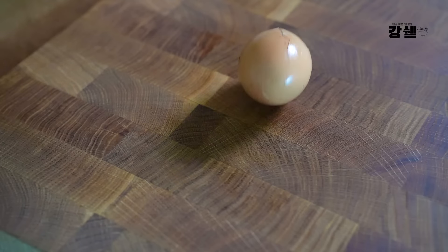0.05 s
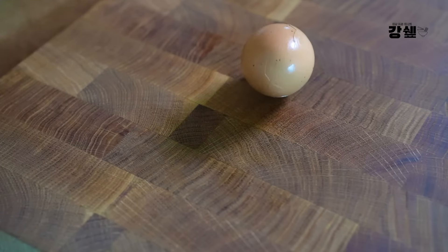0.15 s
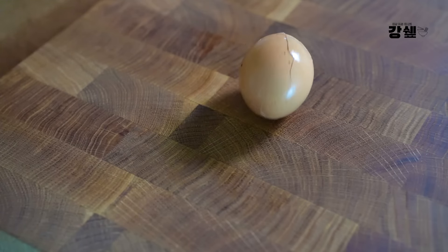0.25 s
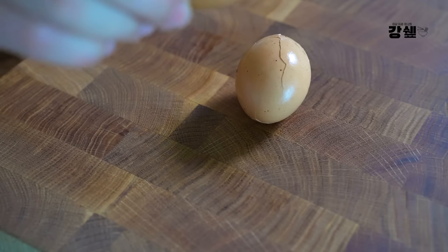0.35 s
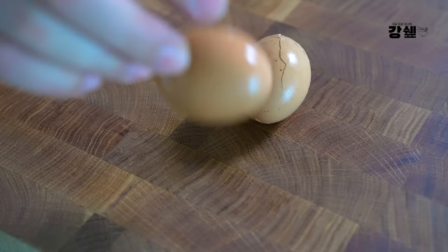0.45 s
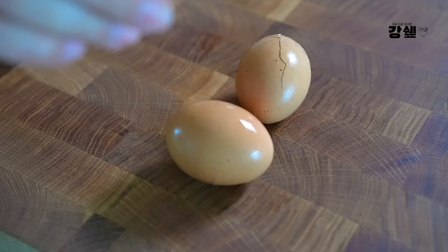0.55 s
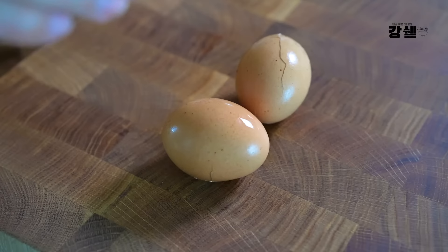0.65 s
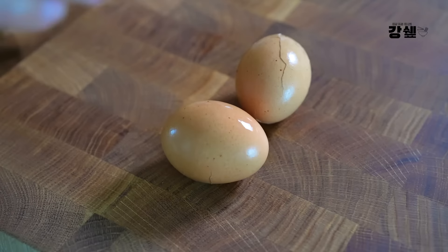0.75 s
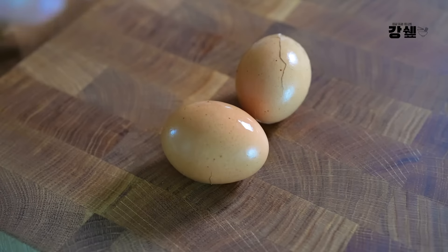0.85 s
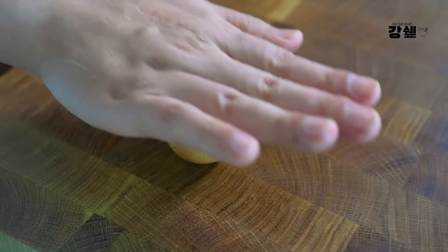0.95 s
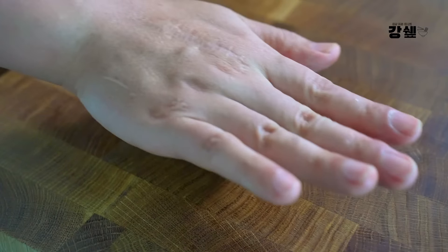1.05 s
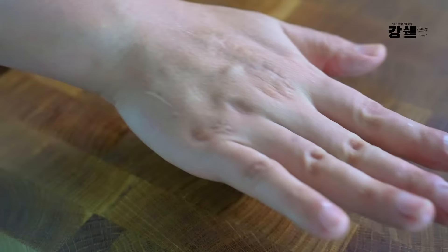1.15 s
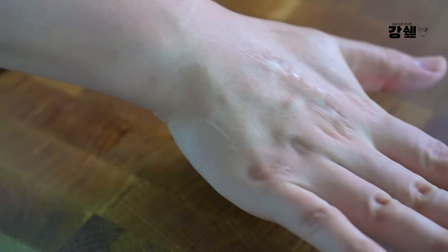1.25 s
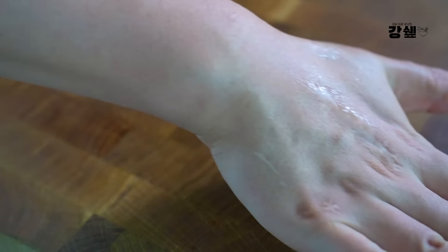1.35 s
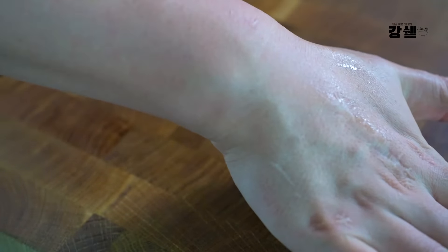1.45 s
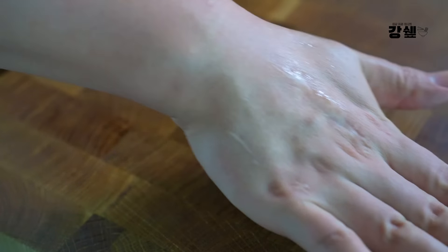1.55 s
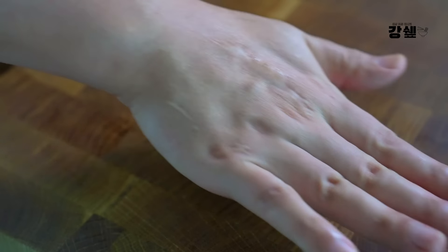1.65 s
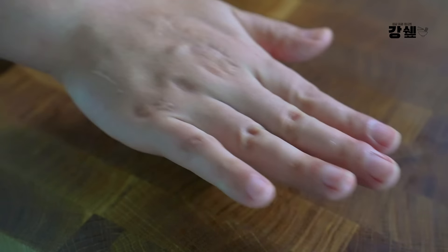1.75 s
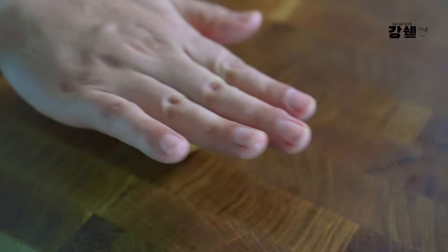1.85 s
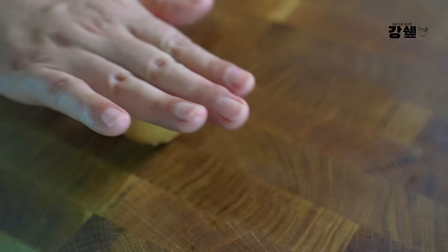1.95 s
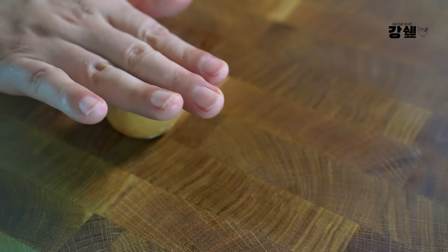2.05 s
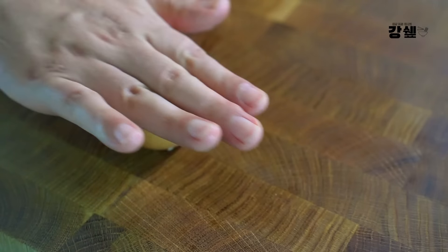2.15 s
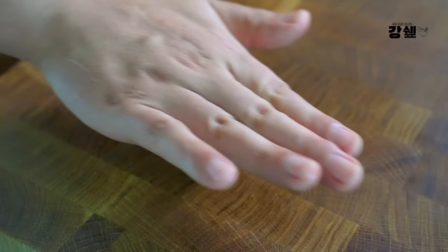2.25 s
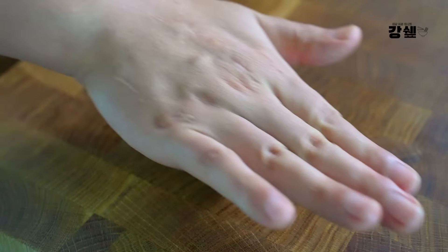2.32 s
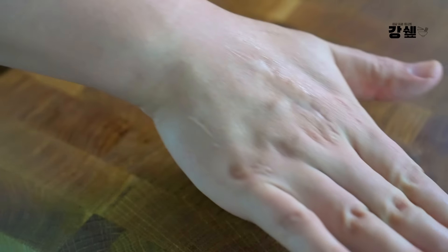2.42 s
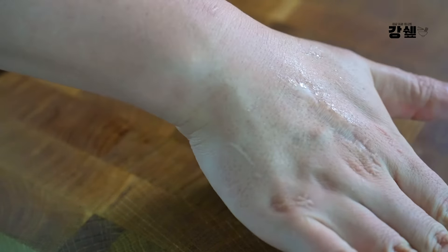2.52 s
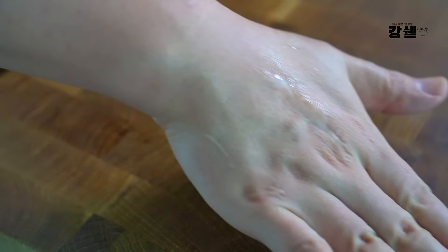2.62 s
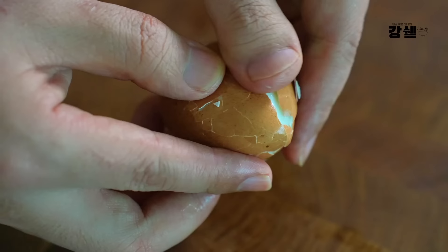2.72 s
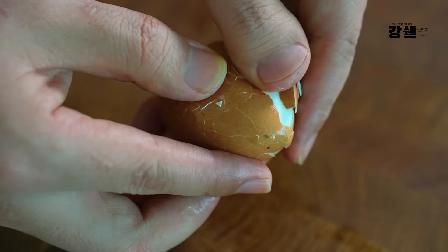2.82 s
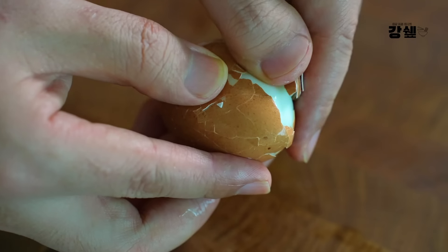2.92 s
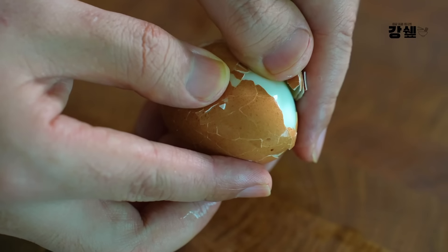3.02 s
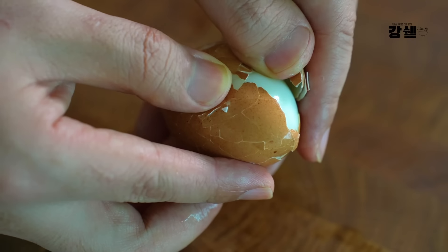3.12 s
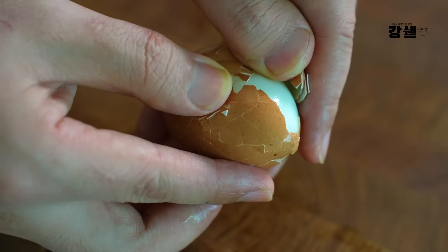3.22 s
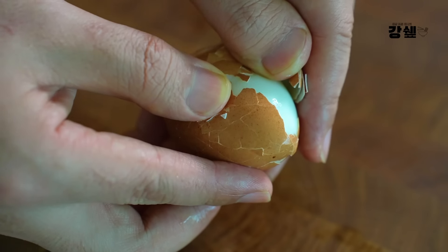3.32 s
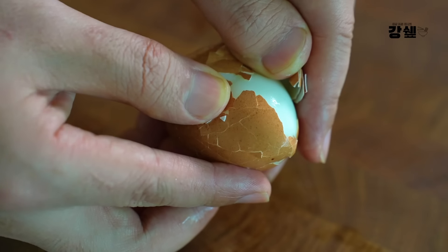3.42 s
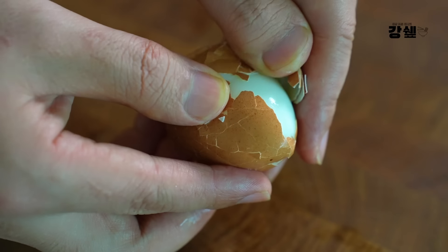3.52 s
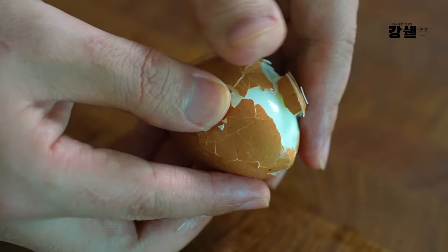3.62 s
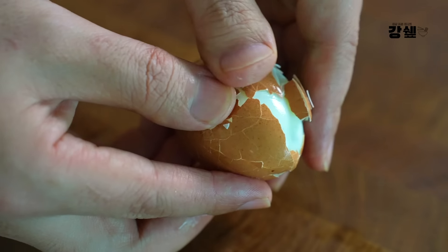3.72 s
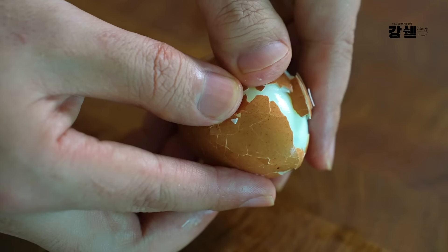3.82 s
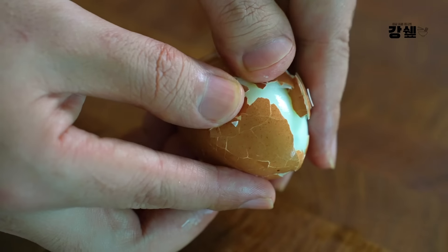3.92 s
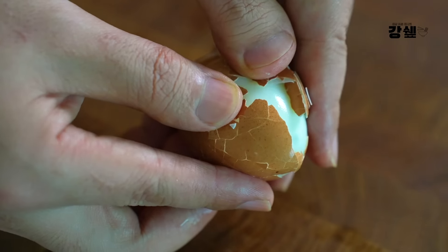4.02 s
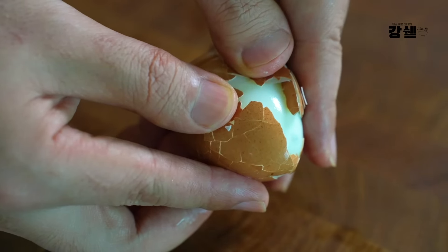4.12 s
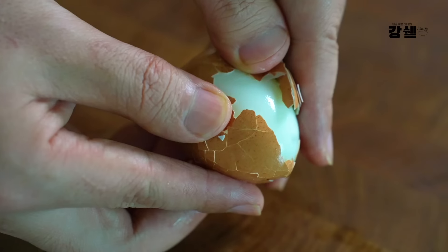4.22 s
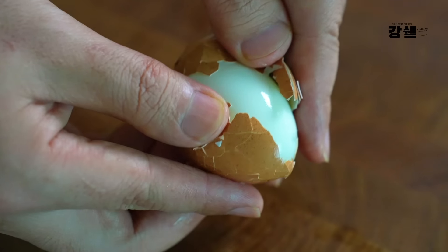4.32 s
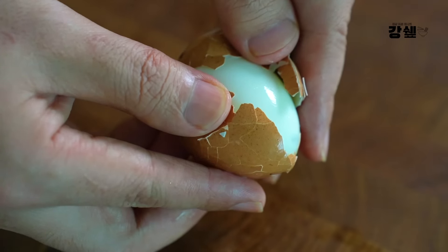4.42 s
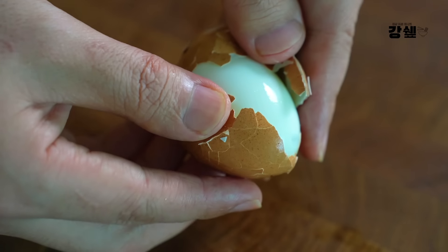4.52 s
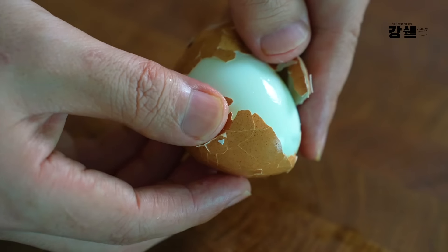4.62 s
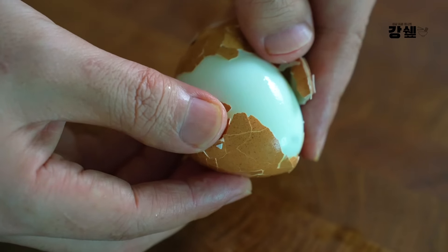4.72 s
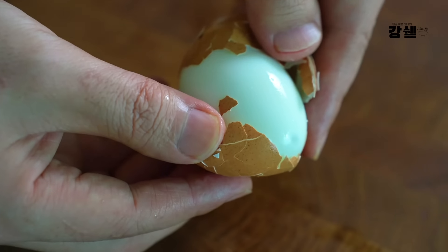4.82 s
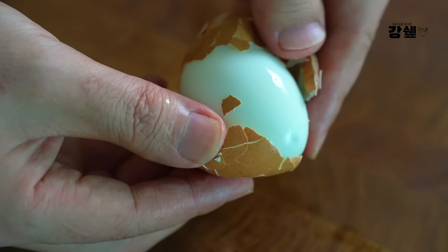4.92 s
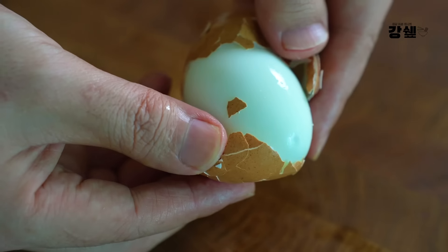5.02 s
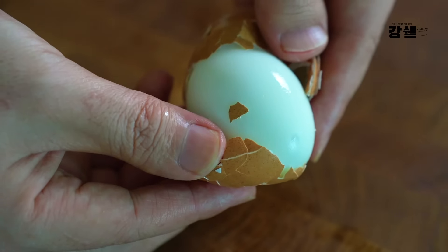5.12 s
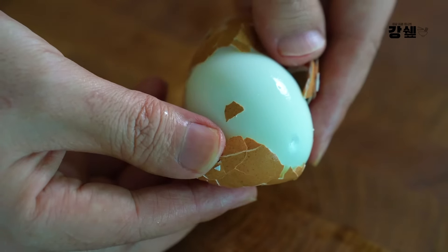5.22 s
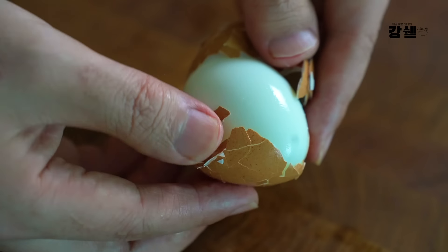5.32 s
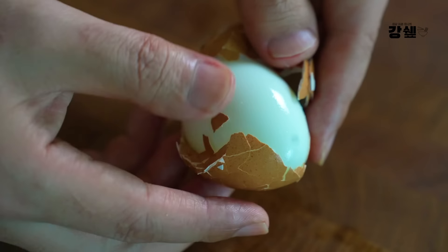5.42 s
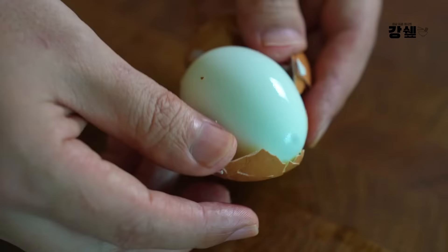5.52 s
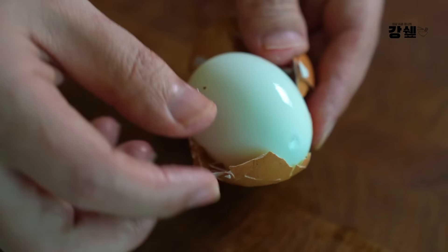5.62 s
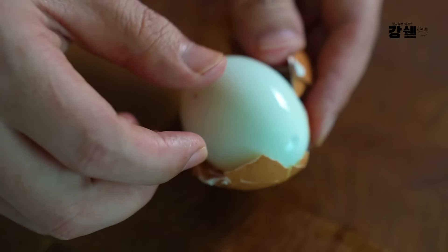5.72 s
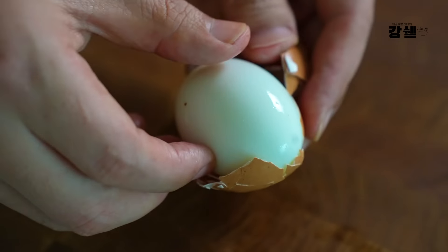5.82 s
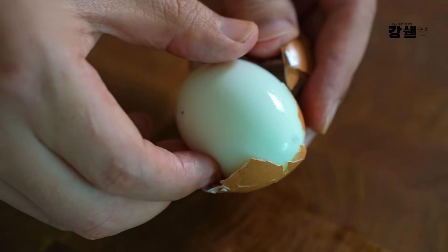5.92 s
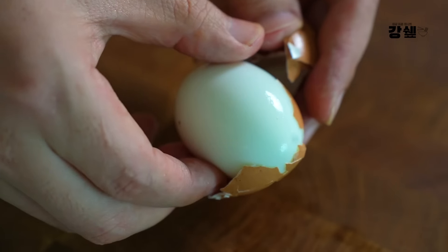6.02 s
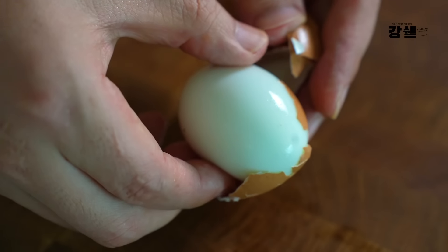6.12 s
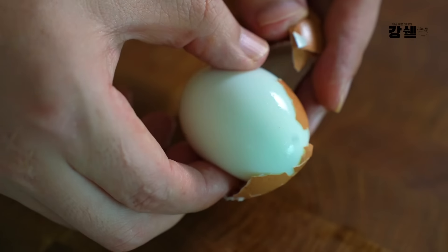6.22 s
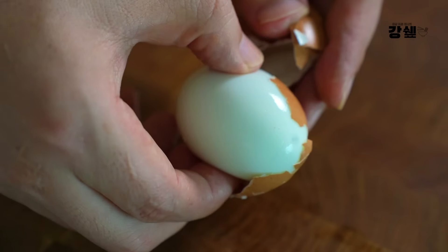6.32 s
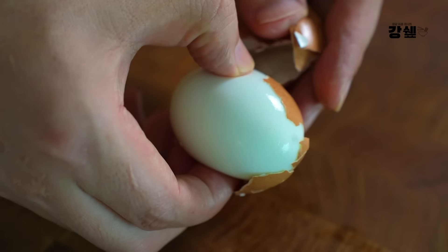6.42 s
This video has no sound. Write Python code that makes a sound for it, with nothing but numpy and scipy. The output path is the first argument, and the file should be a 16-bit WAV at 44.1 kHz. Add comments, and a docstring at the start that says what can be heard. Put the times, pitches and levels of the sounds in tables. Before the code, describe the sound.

Two sharp, loud knocks of boiled eggs on a thick wooden board, each with a faint diffuse tail that stops abruptly. A palm rolls one egg back and forth, crackling and crunching its shell over low wooden bumps. Then, very close, fingers peel it: thin papery tearing, bright tiny snaps, one stronger crack midway, then lighter ticks. Quiet kitchen, close microphone, faint low room noise.

```python
"""Two boiled eggs strike a thick wooden board: impulses excite its modes, and each diffuse tail stops dead.
A palm then rolls one egg to and fro: bursts of micro-fractures crack and crunch its shell against the wood.
Last, close by, thumbs peel it: tearing steps excite the resonances of the flap and of the hollow beneath,
plates snap and briefly ring, and the slipping membrane squeaks a little.
Soft low bumps of the board come throughout, over the steady filtered noise of a quiet kitchen."""
import sys
import numpy as np
from scipy import signal
from scipy.fft import rfft, irfft
from scipy.io import wavfile
from scipy.ndimage import uniform_filter1d

SR = 44100
rng = np.random.default_rng(int(sys.argv[2]) if len(sys.argv) > 2 else 0)


def wav_record(signal):
    """Record a signal, one row per channel, as 16-bit PCM in the file named by sys.argv[1]."""
    frames = np.transpose(np.atleast_2d(signal))
    bounded = np.clip(frames, -1, 1)
    # unit amplitude maps onto the largest positive 16-bit level
    quanta = np.round(bounded * 32767).astype(np.int16)
    wavfile.write(sys.argv[1], SR, quanta)


N = 284886

# Egg meets board: (time [s], level [dB], thump level [dB], spot on the board [0-1],
# relative tail level [dB], time the tail holds its level [s], time until all stops [s])
KNOCKS = [(0.0085, -1.5, -19.5, 0.01, -27.5, 0.064, 0.371), (0.547, -5.5, -21, 0.98, -28, 0.13, 0.396)]
# Shell gives way under the palm: (time [s], relative level [dB], treble gain [dB])
CRACKS = [(1.2561, -30, -9), (1.2761, -22, -5.5), (1.3194, -10, 0), (1.336, -16.5, -3),
          (1.3409, -12.5, 0.5), (1.3497, -9, -1.5), (1.3685, -13.5, -1), (1.376, -13, 0.5),
          (1.4113, -25, 0.5), (1.4172, -17, -9.5), (1.4401, -11.5, 2), (1.5216, -16, -5.5),
          (1.5473, -25, 0), (1.5715, -20, -1), (1.6022, -17, -8), (1.6205, -21, 5), (1.6393, -23, -8),
          (1.6917, -18, -11), (1.718, -15.5, -5), (1.752, -19, -11), (1.7605, -18.5, -14),
          (1.7742, -29, 10), (1.798, -17.5, -12), (1.8181, -22, 17), (1.858, -19.5, -4),
          (1.877, -23.5, -12), (1.9536, -25, -14), (2.0191, -28, -6), (2.2078, -23, -5), (2.237, -23, -2.5),
          (2.2705, -18.5, -6), (2.2766, -22.5, 19), (2.2866, -16.5, -21), (2.3065, -26.5, -17),
          (2.4079, -25, -11), (2.505, -27.5, -9), (2.7382, -22, -8.5)]
# Light contacts with the board, as the first egg settles, the palm lands and a piece of shell comes away:
# (time [s], relative level [dB], treble gain [dB])
TAPS = [(0.072, -26, -15), (0.102, -23, 1), (1.1263, -40.5, -5), (4.313, -21, 3.5), (4.326, -25.5, 22)]
# Soft bumps on the board, from the hands and from the egg rolling over its flattened patches:
# (time [s], relative level [dB], pitch [Hz])
BUMPS = [(0.072, -9, 67), (0.098, -17, 124), (1.015, -23, 41.8), (1.322, -17.5, 120), (1.352, -24, 159),
         (1.435, -20.5, 78), (1.632, -15, 73), (1.71, -18.5, 79), (1.858, -21.5, 72), (1.979, -21, 73),
         (2.245, -27, 77.6), (2.476, -29, 68), (2.687, -33.5, 73), (4.314, -30.5, 121),
         (5.308, -38.5, 68.5)]
# Shell plates snap off: (time [s], relative level [dB], ring frequency [Hz])
SNAPS = [(2.779, -27, 4430), (2.865, -28, 3900), (2.8892, -26.5, 3100), (2.8938, -24, 6050),
         (2.9475, -22.5, 2950), (2.9559, -26.5, 3030), (3.0274, -22, 6230), (3.1061, -33.5, 5730),
         (3.1402, -34, 3020), (3.2094, -31, 6300), (3.2636, -32, 11100), (3.283, -26.5, 2900),
         (3.302, -27, 2980), (3.3119, -30, 2930), (3.3165, -27.5, 3000), (3.3576, -35, 3100),
         (3.3667, -16, 6050), (3.4164, -31.5, 3030), (3.4827, -35.5, 5570), (3.5603, -27.5, 2580),
         (3.5838, -28, 3020), (3.667, -25.5, 4100), (3.7841, -32, 4650), (3.8195, -21.5, 4500),
         (3.842, -31, 2760), (3.8569, -13.5, 4270), (3.895, -27.5, 2720), (3.903, -24, 6700),
         (3.9752, -21, 7400), (3.9966, -21.5, 6960), (4.005, -23, 7000), (4.0675, -21, 4520),
         (4.1302, -26, 2760), (4.134, -24, 5800), (4.19, -22, 5730), (4.213, -16.5, 5750),
         (4.2414, -17, 2600), (4.2448, -11.5, 2130), (4.2651, -12.5, 3030), (4.2914, 0, 5660),
         (4.299, -13.5, 5350), (4.8013, -28, 4070), (4.869, -28, 3780), (4.977, -37, 7200),
         (4.9913, -31, 6600), (5.01, -26, 2080), (5.116, -26, 10950), (5.204, -35, 3400),
         (5.2187, -36, 5500), (5.237, -33, 2410), (5.2591, -26.5, 3400), (5.2844, -31, 2600),
         (5.4858, -41, 5430), (5.4997, -37, 5000), (5.5354, -29.5, 5550), (5.6283, -43.5, 2580),
         (5.7503, -34, 5660), (5.7573, -37, 5550), (5.7694, -34, 5400), (5.82, -35.5, 5470),
         (5.9043, -37.5, 5600), (5.9613, -26, 2700), (5.9933, -29.5, 2740), (6.0635, -18, 2830),
         (6.066, -21.5, 11900), (6.224, -29.5, 3040), (6.2308, -31, 6230), (6.2704, -34, 7900),
         (6.299, -25.5, 7900), (6.325, -25.5, 5900), (6.349, -31.5, 7900), (6.3878, -38, 4300),
         (6.4206, -31, 6140)]
# Every plate mostly rings; low-pitched ones have more click in them than higher ones:
# (ring frequency [Hz], share of the ring in the energy [0-1])
RING_SHARE = [(2700, 0.59), (4300, 0.86), (9000, 0.81)]
# Resonance of the gap under the palm, higher as the hand rolls forward: (time [s], frequency [Hz])
PALM_GAP = [(1.08, 5270), (1.5, 6920), (2.1, 5100), (2.62, 6300)]
# Lifted flap of shell: (time [s], main resonance [Hz], resonance of the hollow beneath [Hz],
# upper resonance [Hz])
FLAP = [(2.76, 4400, 3040, 6350), (3.78, 4600, 2960, 6500), (4.0, 4800, 2900, 6550),
        (4.2, 4600, 2140, 5600), (4.6, 4540, 2000, 5540), (4.85, 4050, 2100, 9100),
        (5.1, 3570, 2150, 10500), (5.24, 3160, 2350, 7500), (5.38, 4470, 2240, 5440),
        (5.8, 4600, 2660, 5530), (6.1, 4800, 2930, 8740), (6.45, 4700, 3170, 9000)]
# Modes of the board: (frequency [Hz], width [Hz], relative level at spot 0 [dB], at spot 1 [dB])
BOARD_MODES = [(94.45, 57.5, 18, 10.5), (283, 90, 5, 4.5), (663, 69, 4.5, 3.5), (847.6, 25, 19, 14),
               (970, 53, 15, 15.5), (1178, 36, 18.5, 11.5), (1314, 67, 11.5, 16.5), (1693, 33, 17.5, -15),
               (1952, 60, -4, 16), (2229, 120, 14, 12.5), (2694, 83, 12.5, -5)]
# Dry crack of shell on wood: (frequency [Hz], gain [dB])
CRACK_TONE = [(40, -14.5), (170, 2.5), (400, -2.5), (850, 3.5), (1900, 3), (3600, 1), (9000, -1.5),
              (15000, -8.5)]
# Broad click of a free plate of shell: (frequency [Hz], gain [dB])
CLICK_TONE = [(60, -33), (600, -7), (1400, -1.5), (1950, -5), (2700, 2), (5000, -1), (7500, 0), (10500, -8),
              (15500, -12)]
# Diffuse wash in the tail of the knocks, its colour: (frequency [Hz], gain [dB])
HALL_TONE = [(40, 8.5), (150, 2.5), (450, -2.5), (2300, 3), (4000, -0.5), (9000, -3), (15000, -11.5)]
# Diffuse wash in the tail of the knocks, its decay: (frequency [Hz], time to fall 60 dB [s])
HALL_T60 = [(100, 0.44), (2200, 0.74), (4500, 0.77), (14000, 0.48)]
# Decay of sound in the kitchen: (frequency [Hz], time to fall 60 dB [s])
KITCHEN_T60 = [(100, 0.57), (1000, 0.19), (5000, 0.078), (14000, 0.12)]
# Still air of the room: (frequency [Hz], relative spectral density [dB])
AIR_TONE = [(20, -6), (45, -9), (64, 0.5), (100, -10.5), (700, -15.5), (1300, -24.5), (3000, -34),
            (15000, -35)]
# The body of the egg sounds along while the shell still grips it: (time [s], gain [dB])
GRIP = [(2.95, -9), (3.3, 1.5), (4.25, -4.5), (4.33, -23)]
# Strokes of the palm, first two light touches, then to and fro:
# (start [s], length [s], relative crunch level [dB], relative rumble level [dB])
STROKES = [(0.945, 0.094, -47, -44), (1.021, 0.13, -49, -50), (1.181, 0.32, -36, -39.5),
           (1.492, 0.57, -28, -35), (2.071, 0.488, -30.5, -39), (2.576, 0.24, -37.5, -47)]
# Pulls of the thumb on the shell: (start [s], length [s], relative level [dB],
# relative level of the hollow beneath [dB], relative level of the upper resonance [dB])
PULLS = [(2.739, 0.2, -33.5, -8, -4), (2.872, 0.16, -33, -5, 1.5), (3.09, 0.43, -38, 5.5, 1),
         (3.585, 0.021, -27.5, 3.5, 0.5), (3.697, 0.09, -39.5, -4, -18), (3.794, 0.14, -33.5, 6.5, 2),
         (3.964, 0.087, -30, 6.5, -1.5), (4.134, 0.057, -30, 16, 11), (4.215, 0.12, -28, -1, -6.5),
         (4.375, 0.24, -52, -4, 0), (4.512, 0.11, -44, -3, -8.5), (4.656, 0.2, -42, -25, -14),
         (4.794, 0.079, -36, -3, -3), (4.928, 0.093, -43, -4, -5), (5.036, 0.096, -36.5, 9.5, 0.5),
         (5.208, 0.14, -38.5, 2.5, -6.5), (5.537, 0.1, -44.5, -1, -11), (5.746, 0.11, -46, 15.5, 2),
         (5.924, 0.095, -42.5, 1, -4), (6.049, 0.088, -38.5, 2, 8), (6.183, 0.05, -42.5, 2, 22),
         (6.29, 0.04, -38, 5, 4), (6.39, 0.088, -39, 1, 0)]
# The membrane slips over the wet white and squeaks: (start [s], length [s], relative level [dB])
SQUEAKS = [(4.667, 0.089, -47), (4.79, 0.033, -42), (5.313, 0.04, -40.5)]

# Each stroke leans in, eases off as the shell gives, and lets go.
LEAN_S, EASE_DB_PER_S, LET_GO_S = 0.14, 21.5, 0.0085
# Each pull takes hold, slackens as the membrane tears, and dies away.
TAKE_HOLD_S, SLACKEN_DB_PER_S, DIE_AWAY_S = 0.0098, 7, 0.037
# Tearing rate of a pull listed at 0 dB; it goes with the root of the pull's strength.
FULL_PULL_STEPS_PER_S = 9700
# A crack runs out quickly, then its edges crumble.
CRACK_RUN_S, CRUMBLE_S, CRUMBLE_DB = 0.0019, 0.007, -13
# Harder cracks push the board more: level of an ordinary crack [dB], bass gain per dB above it [dB per dB].
ORDINARY_CRACK_DB, BASS_PER_DB = -14, 1.54
# The curved piece of shell in the fingers keeps a thin note of its own.
SHELL_NOTE_HZ, SHELL_NOTE_WIDTH_HZ, SHELL_NOTE_DB = 5630, 32, -4
# Second mode of a plate: frequency ratio to the first, relative level [dB].
OVERTONE_RATIO, OVERTONE_DB = 1.9, -9.5
ROLL_END_S = 2.748  # the rolling and its room tail stop dead here
CUTOFF_HZ = 16100


def knocks(size=20000):
    """Impact: an impulse excites the board, crushing shell adds noise, and a diffuse tail stops dead."""
    out = np.zeros(N)
    for s, db, thump_db, spot, tail_db, hold_s, tail_s in KNOCKS:
        blow = attack_one(board(signal.unit_impulse(size), spot, modes_db=-1.0))
        crush = attack_one(coloured(fracture(run_s=0.0017, size=size), CRACK_TONE))
        impact = blow + amp(-2.5) * crush
        wash = rms_one(coloured(reverb(HALL_T60, build_s=0.0029, hold_s=hold_s, size=size), HALL_TONE))
        modes = lingering_modes(spot, hold_s, t60=0.73, size=size)
        tail = amp(-9.0) * wash + amp(-5.5) * modes
        low = thump(hz=61.9, t60=0.58, size=size)
        whole = amp(db) * impact + amp(tail_db) * tail - amp(thump_db) * low
        add(out, s, whole[:round(tail_s * SR)])
    return out


def lingering_modes(spot, hold_s, t60, size):
    """Modal reverberation: bands of noise at the board's modes swell, hold and decay exponentially."""
    t, out = np.arange(size) / SR, 0
    for hz, width_hz, db0, db1 in BOARD_MODES:
        band = ring(ring(rng.standard_normal(size), hz, width_hz), hz, 2 * width_hz)
        gain = amp(db0 + spot * (db1 - db0)) * np.sqrt(width_hz)
        out = out + gain * evened(band, size=3000)
    swell = 1 - np.exp(-t / 0.0044)
    return rms_one(out * dying(t - hold_s, t60) * swell)


def board(force, spot, modes_db):
    """Modal excitation: a force gives a dry crack plus the board's modes, weighted by the spot struck."""
    out = coloured(force, CRACK_TONE)
    for hz, width_hz, db0, db1 in BOARD_MODES:
        out += amp(modes_db + db0 + spot * (db1 - db0)) * ring(force, hz, width_hz)
    return out


def thump(hz, t60, size=30000):
    """Damped oscillation: the whole board bounces on the counter as a decaying sine."""
    t = np.arange(size) / SR
    return np.sin(2 * np.pi * hz * t) * dying(t, t60)


def cracks(rows):
    """Brittle fracture: a burst and its crumbling drive the board; bass follows the level of the crack."""
    out = np.zeros(N)
    for s, db, bright_db in rows:
        force = fracture(CRACK_RUN_S) + amp(CRUMBLE_DB) * fracture(CRUMBLE_S)
        sound = board(force, rng.random(), modes_db=-5)
        bass_db = BASS_PER_DB * (db - ORDINARY_CRACK_DB)
        sound = coloured(sound, [(220, bass_db), (600, 0), (1800, 0), (5000, bright_db)])
        add(out, s, amp(db) * attack_one(sound))
    return out


def fracture(run_s, size=6000):
    """Micro-fracture: a sudden noise burst of force decays exponentially as the crack runs out."""
    return rng.standard_normal(size) * (np.exp(-np.arange(size) / SR / run_s) + 1e-12)


def rolling():
    """Force modulation: the palm's effort scales crunching shell, its damp rustle and the board's rumble."""
    t = np.arange(N // 2) / SR
    breaks = fragments(t, per_s=2000, spread_db=5.5, low_hz=700, high_hz=15000)
    plates = rms_one(grains(t, per_s=350, spread_db=5.5, cluster_s=0.00068))
    breaks += amp(-5.5) * plates  # whole plates give way
    crunch = coloured(board(breaks, 0.77, modes_db=-9.5),
                      [(250, -4.5), (1000, 2.0), (1700, 5.5), (3500, -4.5), (12000, -2.0)])
    rustle = under_palm(grains(t, per_s=1600, spread_db=10, cluster_s=0.0011))
    rumble = coloured(rng.standard_normal(len(t)),
                      [(20, -12.0), (50, 5.0), (72, 3.0), (135, -6.5), (260, -19.5), (900, -41)])
    shell = evened(crunch, size=2000) + amp(-7.5) * evened(rustle)
    wood = evened(rumble, size=2000)
    out = np.zeros(N)
    for s, length_s, db, rumble_db in STROKES:
        force = effort(t - s, length_s, LEAN_S, EASE_DB_PER_S, LET_GO_S)
        add(out, 0, force * (amp(db) * shell + amp(rumble_db) * wood))
    return out


def under_palm(x):
    """Cavity resonance: the moving gap between palm and board picks out its own band of a sound."""
    hz = in_time(PALM_GAP, np.arange(len(x)) / SR)[0]
    return gliding_ring(gliding_ring(x, hz, width_hz=1360), hz, width_hz=2500)


def snaps():
    """Free vibration: a plate breaks with a broad click and briefly rings in two modes of its own."""
    out = np.zeros(N)
    for s, db, hz in SNAPS:
        force = fracture(run_s=0.0009)
        share = np.clip(at_hz(RING_SHARE, hz), 0, .95)
        first, second = (attack_one(ring(ring(force, f, width_hz=780), f, .5 * f))
                         for f in (hz, OVERTONE_RATIO * hz))
        tone = attack_one(coloured(first + amp(OVERTONE_DB) * second, CLICK_TONE))
        click = attack_one(coloured(fracture(run_s=0.00062), CLICK_TONE))
        add(out, s, amp(db) * attack_one(np.sqrt(share) * tone + np.sqrt(1 - share) * click))
    return out


def peeling(size=30000):
    """Stepwise tearing: tiny steps, denser in harder pulls, excite flap and hollow; loose fragments tick."""
    t, out = np.arange(size) / SR, np.zeros(N)
    for s, length_s, db, hollow_db, upper_db in PULLS:
        main_hz, hollow_hz, upper_hz = in_time(FLAP, s + t)
        steps_per_s = FULL_PULL_STEPS_PER_S * np.sqrt(amp(db))
        steps = grains(t, per_s=steps_per_s, spread_db=8, cluster_s=0.00025)
        # the same steps, with independent noise for each path
        main, upper, hollow, edge = (evened(steps * rng.standard_normal(size)) for _ in range(4))
        main = gliding_ring(gliding_ring(main, main_hz, width_hz=440), main_hz, width_hz=4500)
        upper = gliding_ring(gliding_ring(upper, upper_hz, width_hz=1400), upper_hz, width_hz=2100)
        hollow = gliding_ring(gliding_ring(hollow, hollow_hz, width_hz=450), hollow_hz, width_hz=2500)
        flap = main + amp(upper_db) * upper + amp(hollow_db - 1.5) * hollow
        ticks = fragments(t, per_s=3100, spread_db=6.5, low_hz=1980, high_hz=15000)
        mix = rms_one(flap) + amp(-6.0) * ticks + amp(-3.5) * edge
        tearing = evened(coloured(mix, CLICK_TONE), size=2800)
        pull = effort(t, length_s, TAKE_HOLD_S, SLACKEN_DB_PER_S, DIE_AWAY_S)
        add(out, s, amp(db - 3.0) * pull * tearing)
    return out


def squeaks(size=20000):
    """Stick-slip: quick slips of the membrane ring the flap's main resonance alone, which glides."""
    t, out = np.arange(size) / SR, np.zeros(N)
    for s, length_s, db in SQUEAKS:
        hz = in_time(FLAP, s + t)[0]
        slips = grains(t, per_s=900, spread_db=5, cluster_s=0.0005)
        voice = evened(gliding_ring(gliding_ring(slips, hz, width_hz=270), hz, width_hz=1100))
        pull = effort(t, length_s, TAKE_HOLD_S, SLACKEN_DB_PER_S, DIE_AWAY_S)
        add(out, s, amp(db) * pull * voice)
    return out


def held_egg(x):
    """Radiation: free shell is too small for low notes; shell that still grips the egg drives its body."""
    free = signal.sosfilt(signal.butter(5, 1650, "high", fs=SR, output="sos"), x + 1e-18)
    free = free + amp(SHELL_NOTE_DB) * ring(free, SHELL_NOTE_HZ, SHELL_NOTE_WIDTH_HZ)
    body = ring(ring(x, 835, 1060), 670, 1120)
    return free + level(GRIP, np.arange(N) / SR) * body


def fragments(t, per_s, spread_db, low_hz, high_hz, count=8):
    """Size scaling: fragments of many sizes crackle, each in its own broad band; rms 1."""
    bands = (ring(grains(t, per_s / count, spread_db, cluster_s=0.00045), hz, 0.63 * hz)
             for hz in np.geomspace(low_hz, high_hz, count))
    return rms_one(sum(bands))


def grains(t, per_s, spread_db, cluster_s):
    """Random point process: many weak and a few strong breaks, each with a short stutter dying after it."""
    draw = rng.random(len(t)) * SR / per_s
    born, sizes = draw < 1, np.full(len(t), 1e-12)
    sizes[born] = amp(spread_db * np.minimum(-np.log(draw[born]), 5))
    clustered = signal.lfilter([1], [1, -np.exp(-1 / (SR * cluster_s))], sizes)
    return clustered * rng.uniform(-1.2, 1, len(t))


def effort(t, length_s, attack_s, sag_db_per_s, release_s):
    """Force envelope: a movement of the hand, t seconds after its start, builds, sags and is released."""
    build = np.sin(np.pi / 2 * np.clip(t / attack_s, 0, 1)) ** 2
    sag = amp(-sag_db_per_s * np.maximum(t - attack_s, 0))
    return build * sag * np.exp(-np.maximum(t - length_s, 0) / release_s)


def bumps():
    """Soft impact: hands and egg nudge the board into a short, low, damped oscillation."""
    out = np.zeros(N)
    for s, db, hz in BUMPS:
        add(out, s, amp(db) * ring(thump(hz, t60=0.14), hz, 120))
    return out


def reverb(t60, build_s, hold_s=0, size=40000):
    """Diffuse reverberation: noise echoes build up, hold, then decay band by band; unit energy."""
    t, edges = np.arange(size) / SR, np.geomspace(40, 17000, 13)
    out = 0
    for low, high in zip(edges, edges[1:]):
        band_filter = signal.butter(2, [low, high], "band", fs=SR, output="sos")
        band = signal.sosfilt(band_filter, rng.standard_normal(size))
        out = out + band * dying(t - hold_s, at_hz(t60, np.sqrt(low * high)))
    return rms_one(out * (1 - np.exp(-t / build_s))) / np.sqrt(size)


def still_air():
    """Stationary noise: a steady random signal is shaped to the spectrum of the quiet room."""
    return amp(-57.5) * rms_one(coloured(rng.standard_normal(N), AIR_TONE))


def dying(t, t60):
    """Exponential decay: full level until time zero, then 60 dB down in t60 seconds."""
    return np.exp(-np.log(1000) * np.maximum(t, 0) / t60)


def resonance(hz, width_hz):
    """Damped resonator: coefficients of a two-pole resonance with gain about 1 at its peak."""
    r = np.exp(-np.pi * width_hz / SR)
    return (1 - r * r) / 2 * np.array([1, 0, -1]), [1, -2 * r * np.cos(2 * np.pi * hz / SR), r * r]


def ring(x, hz, width_hz):
    """Forced vibration: a force passes through one resonance."""
    return signal.lfilter(*resonance(hz, width_hz), x + 1e-18)


def gliding_ring(x, hz, width_hz, size=512):
    """Time-varying resonance: the centre moves block by block while the vibration carries on."""
    out, state = np.zeros(len(x)), np.zeros(2)
    for i in range(0, len(x), size):
        coefficients = resonance(hz[i], width_hz)
        out[i:i + size], state = signal.lfilter(*coefficients, x[i:i + size] + 1e-18, zi=state)
    return out


def coloured(x, spectrum, size=4096):
    """Minimum-phase filtering: the folded cepstrum gives a causal filter with the given spectrum."""
    hz = np.arange(size // 2 + 1) * SR / size
    cepstrum = irfft(np.log(amp(at_hz(spectrum, hz))))
    cepstrum[1:size // 2] *= 2
    cepstrum[size // 2 + 1:] = 0
    return signal.oaconvolve(x, irfft(np.exp(rfft(cepstrum))))[:len(x)]


def evened(x, size=1300):
    """Level equalisation: division by the short-term rms holds the level near 1 and keeps the grain."""
    power = uniform_filter1d(uniform_filter1d(x ** 2, size), size // 2)
    return x / np.sqrt(np.abs(power) + 1e-12)


def attack_one(x, size=176):
    """Onset normalisation: the first 4 ms have unit rms."""
    return x / np.sqrt(np.mean(x[:size] ** 2))


def rms_one(x):
    """Power normalisation: the whole signal has unit rms."""
    return x / np.sqrt(np.mean(x ** 2) + 1e-20)


def amp(db):
    """Logarithmic level: decibels to amplitude gain."""
    return 10 ** (np.asarray(db) / 20)


def in_time(rows, t):
    """Linear interpolation: each column of a curve at the times t."""
    s, *columns = np.transpose(rows)
    return [np.interp(t, s, c) for c in columns]


def level(rows, t):
    """Logarithmic level: gain at the times t from a curve in dB."""
    return amp(in_time(rows, t)[0])


def at_hz(points, hz):
    """Logarithmic pitch: a table is read on a log-frequency axis."""
    f, value = np.transpose(points)
    return np.interp(np.log(hz + 1e-9), np.log(f), value)


def add(out, s, sound):
    """Superposition: a sound is summed in at time s."""
    i = max(round(s * SR), 0)
    out[i:i + len(sound)] += sound[:N - i]


def scene():
    """Superposition: all sources sum, rolling and handling with the reverberation of the kitchen."""
    kitchen = reverb(KITCHEN_T60, build_s=0.00028, size=18000)
    cracked = cracks(CRACKS)
    rolled = cracked + amp(1.5) * under_palm(cracked) + rolling()
    rolled = rolled + amp(-12.5) * signal.oaconvolve(rolled, kitchen)[:N]
    rolled = rolled * (np.arange(N) / SR < ROLL_END_S)
    handled = cracks(TAPS) + held_egg(snaps() + peeling() + squeaks())
    handled = handled + amp(-12.0) * signal.oaconvolve(handled, kitchen)[:N]
    return (knocks() + rolled + handled + bumps() + still_air())[None]


def record(dry):
    """Overload and band limit: peaks beyond full scale are clipped, then a steep low-pass cuts the top."""
    low_pass = signal.ellip(10, .1, 70, CUTOFF_HZ, fs=SR, output="sos")
    return signal.sosfilt(low_pass, np.clip(dry, -1, 1))


dry = scene()
out = record(dry)
wav_record(out)
```